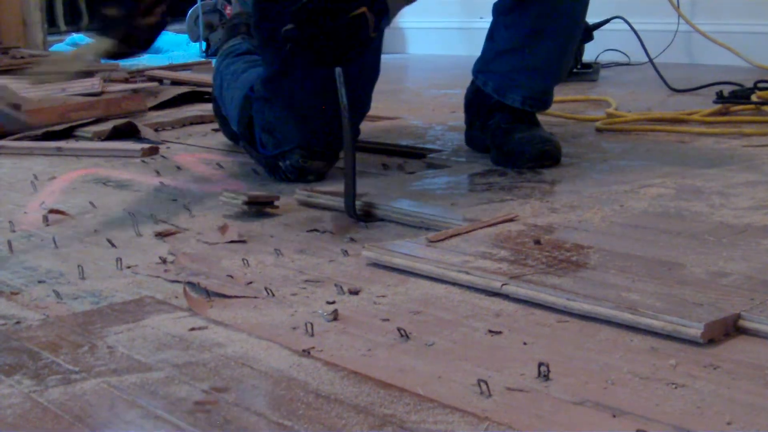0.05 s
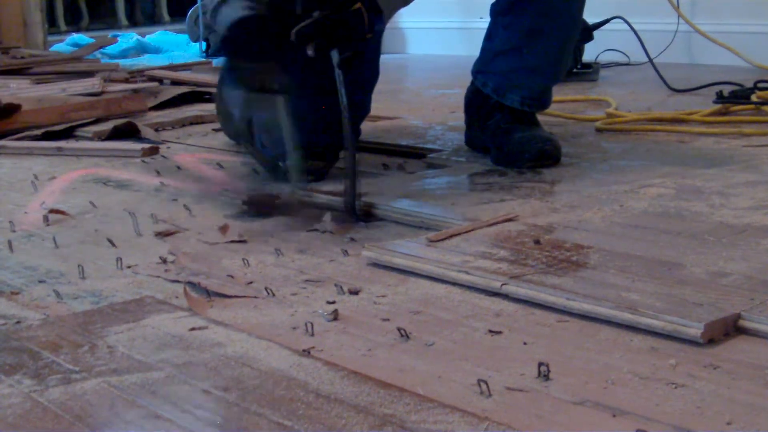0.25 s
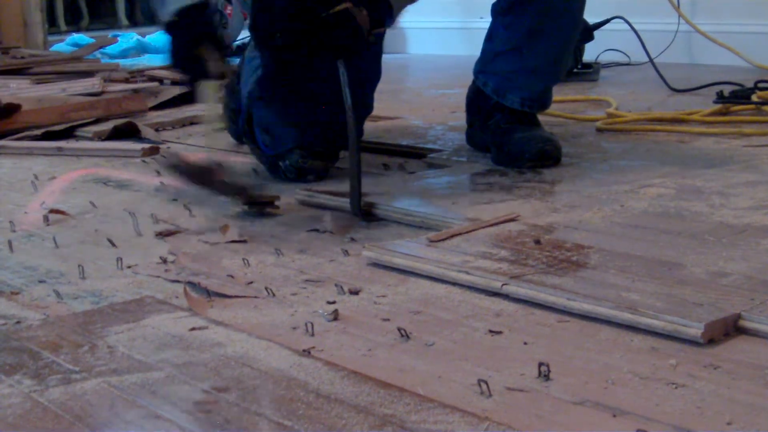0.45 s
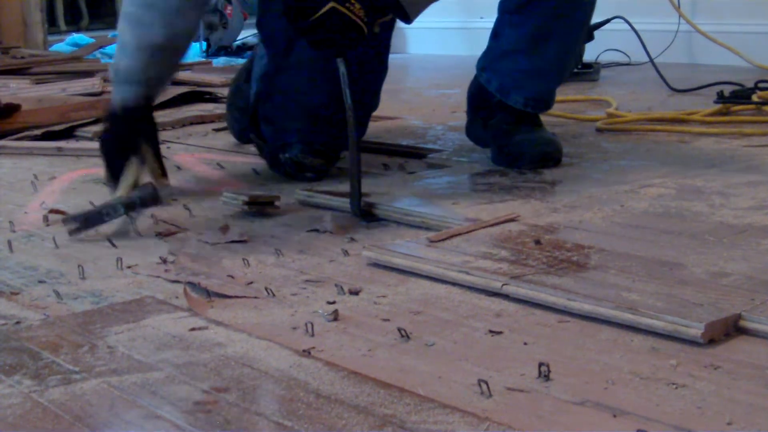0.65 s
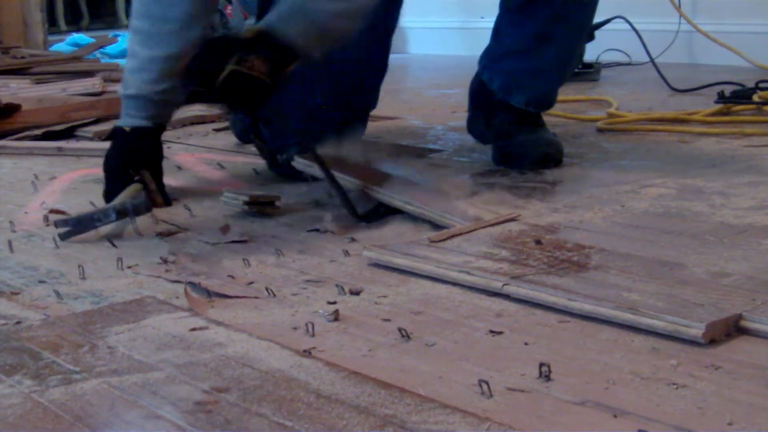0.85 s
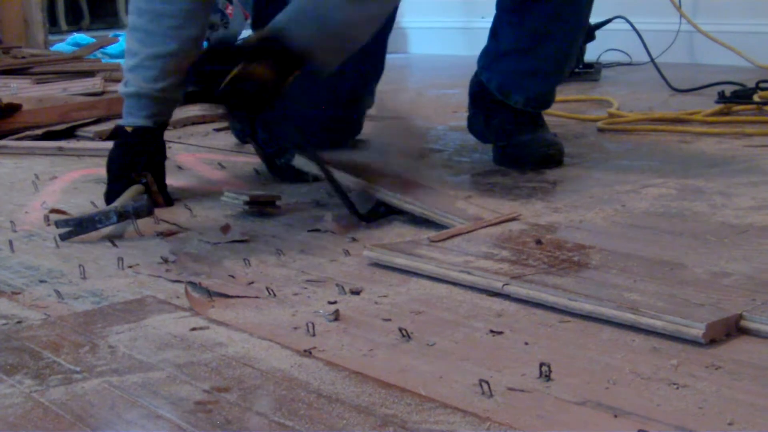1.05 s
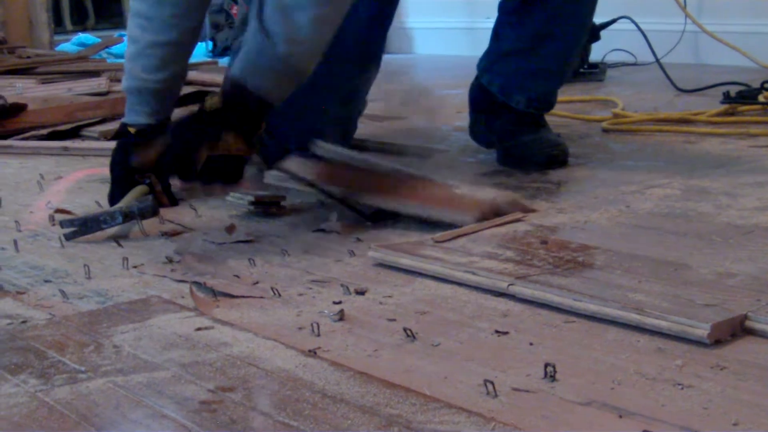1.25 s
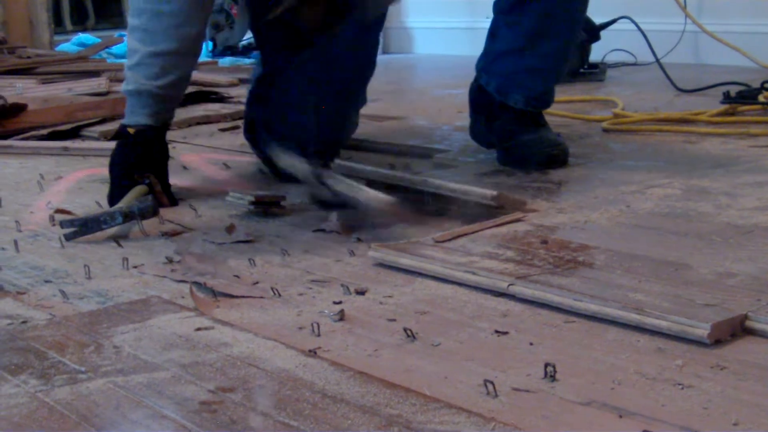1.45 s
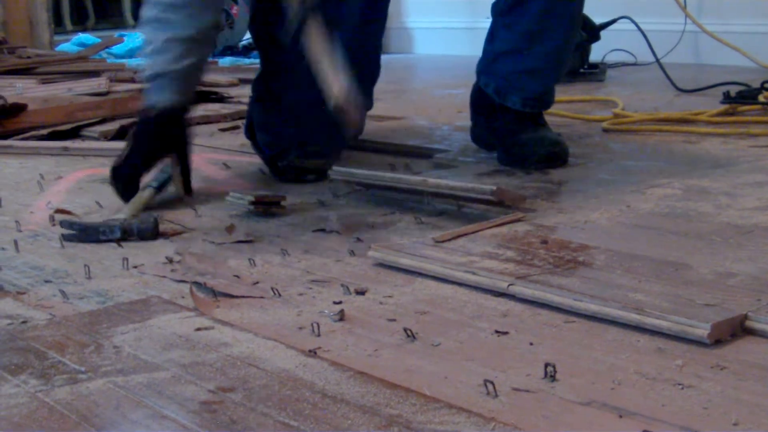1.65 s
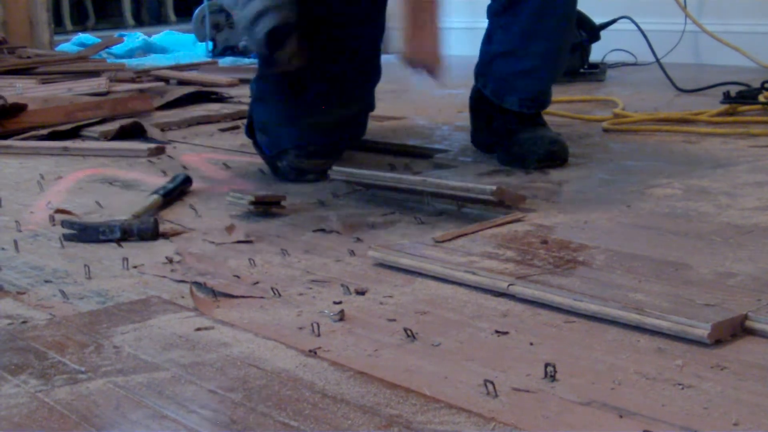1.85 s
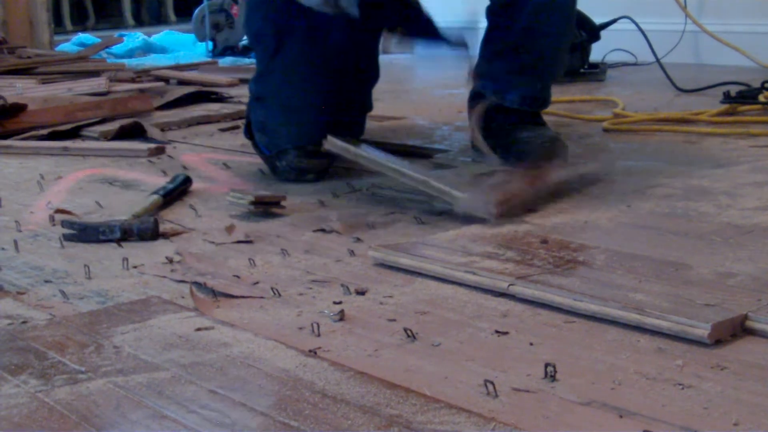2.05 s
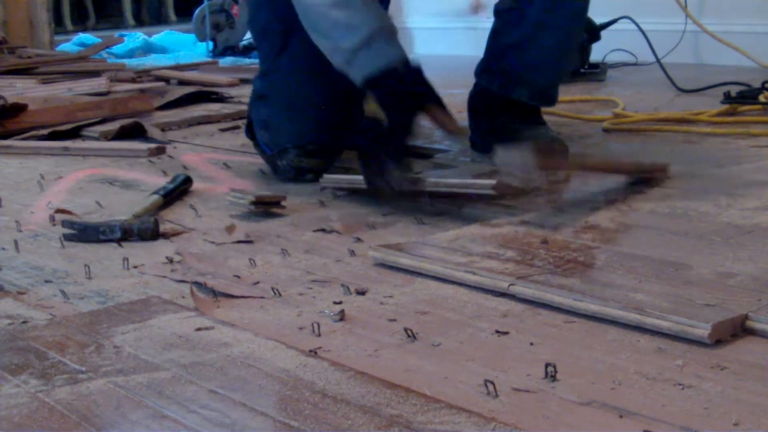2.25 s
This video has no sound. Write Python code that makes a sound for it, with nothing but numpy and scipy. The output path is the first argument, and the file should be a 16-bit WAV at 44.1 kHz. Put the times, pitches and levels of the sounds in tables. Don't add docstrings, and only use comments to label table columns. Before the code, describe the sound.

Hardwood floor strip being pried up: a bright hammer blow on a steel bar, the hammer set down with a gritty scrape, a sharp wood crack, then a piece knocks down, close microphone in an echoing empty room.

```python
import sys
import numpy as np
from scipy import signal
from scipy.fft import rfft, irfft
from scipy.io import wavfile

SR = 44100
rng = np.random.default_rng(int(sys.argv[2]) if len(sys.argv) > 2 else 0)


def file_out(sig):
    cols = np.atleast_2d(sig).T
    lim = np.clip(cols, -1, 1)
    pcm = np.round(lim * 32767).astype(np.int16)
    wavfile.write(sys.argv[1], SR, pcm)


def volts_from_db(level):
    exponent = np.asarray(level, float) / 20
    return 10 ** exponent


N = 101429
LEAD = SR // 2


def at_hz(points, hz):
    table_hz, value = np.transpose(points)
    return np.interp(np.log(hz + 1), np.log(table_hz), value)


def body(spectrum, peaks, broad_db):
    half = 16384
    hz = np.arange(half + 1) * SR / (2 * half)
    power = volts_from_db(2 * (at_hz(spectrum, hz) + broad_db))
    for centre_hz, width_hz, level_db in peaks:
        power = power + volts_from_db(2 * level_db) / (1 + (2 * (hz - centre_hz) / width_hz) ** 2) ** 2
    cepstrum = irfft(np.log(power) / 2)
    cepstrum[1:half] *= 2
    cepstrum[half + 1:] = 0
    answer = irfft(np.exp(rfft(cepstrum)))[:half]
    return answer / np.abs(answer).max()


def contacts(rows, rattle_s=0.0006):
    loop_gain, treble_hz, length = 0.825, 3635, 1000
    out = np.zeros(N + LEAD)
    low_pass = signal.butter(2, treble_hz, fs=SR)
    for start_s, level_db, treble_db in rows:
        burst = signal.unit_impulse(length)
        gaps = rng.uniform(0.15, 1, 4) * rattle_s * SR
        for gap in np.maximum(gaps, 1).astype(int):
            forward = np.r_[loop_gain, np.zeros(gap), 1]
            burst = signal.lfilter(forward, forward[::-1], burst)
        for stage in range(2):
            low = signal.lfilter(*low_pass, burst)
            burst = low + volts_from_db(treble_db / 2) * (burst - low)
        i = int(start_s * SR) + LEAD
        out[i:i + length] += 2 * volts_from_db(level_db) * burst[:len(out) - i]
    return out


def strike(hits, answer):
    return signal.fftconvolve(hits, answer)[:N + LEAD]


# start_s [s], level_db [dB], treble_db [dB]
BLOW_HITS = [
    (.2085, -38, 6),
    (.2108, 0, -2),
]
# pitch_hz [Hz], level_db [dB per Hz]
BAR_COLOUR = [(35, -90.5), (60, -71), (246, -22), (667, -17), (784, -19.5), (1310, -5.5), (4250, -11),
              (9570, -13), (15200, -20.5)]
# pitch_hz [Hz], width_hz [Hz], level_db [dB]
BAR_MODES = [(290, 38, -14), (662, 69, -13), (1480, 300, -8), (2569, 210, -3), (5880, 740, -3),
             (7870, 250, -10), (9670, 400, -2.5), (11530, 1000, -7), (15310, 150, -13.5)]


def hammer_blow():
    return strike(contacts(BLOW_HITS, rattle_s=0.001), body(BAR_COLOUR, BAR_MODES, broad_db=2.0))


# start_s [s], level_db [dB], treble_db [dB]
CRACK_HITS = [
    (1.0505, -42, -10),
    (1.0548, -28, -30),
    (1.0565, -16.5, -18),
    (1.064, -22.5, -9),
    (1.067, -7, -13),
    (1.0792, -28, 7),
    (1.089, -28.5, 7),
    (1.098, -38, 6),
]
# pitch_hz [Hz], level_db [dB per Hz]
STRIP_COLOUR = [(24, -60), (40, -25), (530, -15.5), (663, -9.5), (851, -8), (1330, -2), (3510, -8),
                (12500, -11.5), (15200, -22.5)]
# pitch_hz [Hz], width_hz [Hz], level_db [dB]
STRIP_MODES = [(1303, 86, 2.5), (1860, 900, -32), (2534, 410, -4.5), (5640, 1260, -3.5), (10960, 3400, -8)]


def strip_cracks():
    return strike(contacts(CRACK_HITS, rattle_s=0.00045), body(STRIP_COLOUR, STRIP_MODES, broad_db=-1.5))


# start_s [s], level_db [dB], treble_db [dB]
END_LANDINGS = [
    (2.013, -21, -2.5),
    (2.025, -38, 3),
]
# pitch_hz [Hz], level_db [dB per Hz]
END_COLOUR = [(24, -68), (40, -45.5), (178, -16), (963, -7.5), (1400, 1.5), (1710, -7), (2130, 2.5),
              (3420, -12), (15200, -42.5)]
# pitch_hz [Hz], width_hz [Hz], level_db [dB]
END_MODES = [(258, 230, -22.5), (1380, 80, -18), (1790, 40, -9), (2187, 260, -4.5), (2550, 87, -11.5),
             (3146, 98, -10), (4310, 240, -19.5), (10900, 2000, -35)]


def piece_lands_on_end():
    return strike(contacts(END_LANDINGS), body(END_COLOUR, END_MODES, broad_db=-9.0))


# start_s [s], level_db [dB], treble_db [dB]
FLAT_LANDINGS = [
    (2.2575, -33.5, -4),
    (2.2615, -34.5, -1.5),
    (2.274, -40, -4.5),
    (2.279, -38, 2),
    (2.291, -43, 12),
]
# pitch_hz [Hz], level_db [dB per Hz]
FLAT_COLOUR = [(35, -37.5), (60, -51.5), (732, -2), (1570, 0), (2030, -7), (2280, -11), (3450, -30),
               (11200, -51.5), (15200, -45)]
# pitch_hz [Hz], width_hz [Hz], level_db [dB]
FLAT_MODES = [(296, 86, -2.5), (741, 75, 1), (1400, 51, -4), (2310, 340, 4), (11300, 4500, -36)]


def piece_falls_flat():
    return strike(contacts(FLAT_LANDINGS), body(FLAT_COLOUR, FLAT_MODES, broad_db=2.0))


# start_s [s], level_db [dB]
DRAG_PRESSURE = [
    (0.671, -74),
    (.71, -75.5),
    (.737, -65),
    (0.74, -55.5),
    (.765, -62.5),
    (.785, -55),
    (0.809, -68),
    (.86, -72),
]


def drag():
    grit_per_s, spread_db = 2500, 5.22
    length = N + LEAD
    start_s, level_db = np.transpose(DRAG_PRESSURE)
    born = rng.random(length) < grit_per_s / SR
    sizes = volts_from_db(spread_db * np.minimum(rng.exponential(1, length), 4))
    signs = rng.choice([-1, 1], length)
    t = (np.arange(length) - LEAD) / SR
    return born * sizes * signs * volts_from_db(np.interp(t, start_s, level_db, -200, -200))


# start_s [s], level_db [dB], treble_db [dB]
LAY_DOWN_KNOCKS = [(.61, -43.5, -38), (.66, -47.5, -36), (.68, -64, -3), (.693, -64, 10),
                   (.71, -45.5, -3.5), (.718, -54, 8), (.7405, -40.5, 0.5), (.752, -51.5, 15.5),
                   (.77, -49, -11.5), (.778, -33.5, -37), (.7815, -37, -19), (.787, -44, -11),
                   (.794, -53, 18.5), (.797, -55, -2), (.804, -48, -14), (.813, -51, 11)]
# pitch_hz [Hz], level_db [dB per Hz]
GRIT_COLOUR = [(24, -45), (40, -11), (292, -8), (468, -7), (1180, 3), (1620, -3.5), (2080, -7),
               (11000, -15), (15200, -28)]
# pitch_hz [Hz], width_hz [Hz], level_db [dB]
GRIT_MODES = [(1210, 160, -28), (2150, 790, -0.5), (11100, 5200, -11.5)]


def hammer_laid_down():
    hits = contacts(LAY_DOWN_KNOCKS, rattle_s=0.0013) + drag()
    return strike(hits, body(GRIT_COLOUR, GRIT_MODES, broad_db=0.5))


# start_s [s], level_db [dB], treble_db [dB]
SPLINTER_TICKS = [
    (1.9405, -55.5, -3),
    (1.9425, -45.5, -11),
    (1.9448, -54, 14),
    (1.95, -45, -25),
    (1.976, -82, -5),
]
# pitch_hz [Hz], level_db [dB per Hz]
SPLINTER_COLOUR = [(35, -65), (60, -46), (219, 12), (401, -1.5), (715, 10.5), (1060, -2), (1570, 9),
                   (2940, -7), (15200, -19.5)]
# pitch_hz [Hz], width_hz [Hz], level_db [dB]
SPLINTER_MODES = [(1440, 600, 2), (2535, 260, 1.5), (5500, 700, -20)]


def splinter_lands():
    return strike(contacts(SPLINTER_TICKS), body(SPLINTER_COLOUR, SPLINTER_MODES, broad_db=-9.0))


# start_s [s], level_db [dB], treble_db [dB]
STRIP_NUDGES = [
    (1.402, -63, -3),
    (1.592, -57.5, -6),
    (1.607, -56.5, -8),
    (1.617, -64.5, 1),
]
# pitch_hz [Hz], level_db [dB per Hz]
LOOSE_COLOUR = [(59, -64), (100, -16.5), (237, -1), (409, -5), (872, -6.5), (2060, -38), (10900, -25),
                (15200, -39)]
# pitch_hz [Hz], width_hz [Hz], level_db [dB]
LOOSE_MODES = [(920, 160, -8), (1264, 180, -8), (3370, 120, -32)]


def loose_strip_nudged():
    return strike(contacts(STRIP_NUDGES, rattle_s=0.0029), body(LOOSE_COLOUR, LOOSE_MODES, broad_db=-2.5))


# start_s [s], level_db [dB], treble_db [dB]
KNEE_THUDS = [
    (.712, -54, -3),
    (.723, -60, -5),
    (1.543, -58.5, -9),
    (1.549, -59.5, -18),
    (1.572, -56.5, -6),
    (1.62, -64, -15),
    (1.657, -63, -1),
    (1.686, -59.5, -3),
]
# pitch_hz [Hz], level_db [dB per Hz]
SUBFLOOR_COLOUR = [(24, -47), (40, -12), (280, -1), (654, -12.5), (808, -23), (925, -10.5), (4000, -31),
                   (5200, -58), (8800, -120)]
# pitch_hz [Hz], width_hz [Hz], level_db [dB]
SUBFLOOR_MODES = [(251, 56, -1), (320, 25, 1)]


def knee_thuds():
    return strike(contacts(KNEE_THUDS), body(SUBFLOOR_COLOUR, SUBFLOOR_MODES, broad_db=-4.5))


# start_s [s], pitch_hz [Hz], level_db [dB], t60_s [s]
BOARD_RINGS = [(.212, 1510, -7.5, .02), (0.233, 2437, -18.5, 0.041), (.216, 273, -35, 0.064),
               (.232, 710, -25, 0.047), (.741, 1010, -47, 0.025), (.771, 1900, -44, 0.022),
               (0.7785, 2410, -35, 0.017), (.781, 1335, -32, 0.022), (.795, 910, -38, 0.028),
               (1.056, 1333, -27, 0.068), (1.0567, 2200, -21, 0.016), (1.0636, 1760, -17, 0.025),
               (1.0677, 1934, -19, 0.026), (1.0716, 1337, -27, 0.16), (1.5436, 320, -53, .12),
               (1.572, 265, -47.5, .07), (1.591, 1242, -49.5, 0.04), (1.607, 840, -47.5, 0.038),
               (1.615, 954, -47.5, 0.033), (1.62, 290, -53, 0.044), (1.9442, 5610, -34, .01),
               (1.948, 2535, -43, .04), (2.015, 2114, -38, 0.81), (2.015, 2193, -37, 0.44),
               (2.04, 1376, -39.5, 0.54), (2.0135, 2150, -25, 0.047), (2.0295, 2200, -23, 0.027),
               (2.014, 696, -29, 0.032), (2.26, 296, -38.5, 0.035), (2.274, 2310, -32.5, 0.049)]


def rings():
    rise_s = 0.0009
    start_s, pitch_hz, level_db, t60_s = np.transpose(BOARD_RINGS)[:, :, None]
    t = np.maximum(np.arange(N) / SR - start_s, 0)
    decay = volts_from_db(level_db - 60 * t / t60_s)
    return (decay * np.sin(2 * np.pi * pitch_hz * t) * (1 - np.exp(-t / rise_s))).sum(axis=0)


# start_s [s], level_db [dB]
JOIST_JOLTS = [
    (0.21, -71),
    (.72, -56),
    (0.789, -53),
    (1.068, -66),
    (1.2, -64),
    (1.561, -67),
    (1.77, -70),
    (2.031, -60),
    (2.272, -74),
]


def joists():
    pitch_hz, t60_s, rise_s, left_db = 61.4, 0.15, 0.012, 0.8
    clicks = np.zeros(N)
    for start_s, level_db in JOIST_JOLTS:
        clicks[int(start_s * SR)] = volts_from_db(level_db)
    t = np.arange(LEAD) / SR
    mode = np.sin(2 * np.pi * pitch_hz * t) * volts_from_db(-60 * t / t60_s) * (1 - np.exp(-t / rise_s))
    return signal.fftconvolve(clicks, mode)[:N] * volts_from_db([[left_db], [-left_db]])


# start_s [s], level_db [dB], treble_db [dB]
EARLIER_HIT = [
    (-.27, -7.5, 4.5),
]
# pitch_hz [Hz], level_db [dB per Hz]
EARLIER_COLOUR = [(60, -44), (300, -21), (640, -20), (1500, -8.5), (6000, -18.5), (12000, -23.5),
                  (15200, -53.5)]
# pitch_hz [Hz], width_hz [Hz], level_db [dB]
EARLIER_MODES = [(645.6, 26, -9.5), (1240, 380, 1), (2310, 420, 1), (2760, 98, -8), (3690, 90, -3.5),
                 (5140, 1500, -12.5)]


def earlier_blow():
    return strike(contacts(EARLIER_HIT), body(EARLIER_COLOUR, EARLIER_MODES, broad_db=2.5))


# pitch_hz [Hz], t60_s [s]
ROOM_DECAY = [(100, 0.29), (260, 0.91), (700, 0.82), (1840, 0.63), (4850, 0.62), (12800, 0.34)]
# delay_s [s], level_db [dB]
FIRST_WALLS = [(.01, -28.5), (.017, -30.5), (0.023, -29), (0.035, -32.5)]
# pitch_hz [Hz], level_db [dB]
STEREO_WIDTH = [(60, -17), (250, -27), (700, -31), (1500, -40), (2800, -39), (5000, -40), (15000, -46.5)]


def room():
    tail_db, rise_s, scatter_s = -24.5, 0.0036, 0.0032
    flutter_s, flutter_share = 0.0175, 0.39
    t = np.arange(int(SR * 1.4)) / SR
    edges_hz = 30 * 2 ** np.arange(0, 9.6, 0.5)
    white = rng.standard_normal((2, 2, len(t)))
    tail = 0
    for k, (low, high) in enumerate(zip(edges_hz, edges_hz[1:])):
        hz = np.sqrt(low * high)
        band_pass = signal.butter(2, [low, high], "band", fs=SR, output="sos")
        band = signal.sosfilt(band_pass, white[k % 2])
        side_share = volts_from_db([[0], [at_hz(STEREO_WIDTH, hz)]])
        tail = tail + band * volts_from_db(-60 * t / at_hz(ROOM_DECAY, hz)) * side_share
    flutter = 1 + flutter_share * np.cos(2 * np.pi * t / flutter_s) * np.exp(-t / 0.08)
    out = volts_from_db(tail_db) * tail * flutter * (1 - np.exp(-(t / rise_s) ** 2))
    for delay_s, level_db in FIRST_WALLS:
        out[0] += volts_from_db(level_db) * white[0, 0, ::-1] * np.exp(-((t - delay_s) / scatter_s) ** 2)
    return out


# pitch_hz [Hz], level_db [dB per Hz]
HUSH_COLOUR = [(25, -13.5), (60, 2.5), (200, -10), (1200, -16.5), (2000, -8.5), (2900, -21.5),
               (3500, -14.5), (4200, -29), (15000, -50)]


def hush():
    level_db = -82
    hz = np.arange(N // 2 + 1) * SR / N
    colour_db = at_hz(HUSH_COLOUR, hz) + [0 * hz, at_hz(STEREO_WIDTH, hz) + 6]
    noise = irfft(rfft(rng.standard_normal((2, N))) * volts_from_db(colour_db), N)
    return volts_from_db(level_db) * noise / noise[0].std()


def scene():
    knee, nudged = knee_thuds(), loose_strip_nudged()
    placed = [(hammer_blow(), 3), (strip_cracks(), 3), (piece_lands_on_end(), -1.5),
              (piece_falls_flat(), 1.5), (hammer_laid_down(), 6), (splinter_lands(), 6),
              (nudged, 3), (knee, 0.5), (earlier_blow(), 0)]
    direct = sum(volts_from_db(near_db) * sound for sound, near_db in placed)[LEAD:]
    everything = sum(sound for sound, near_db in placed)
    echo = room()
    reverb = signal.fftconvolve(everything[None], echo, axes=1)[:, LEAD:N + LEAD]
    mid, side = reverb + hush()
    side = side + 0.074 * signal.fftconvolve(knee + nudged, echo[0])[LEAD:N + LEAD]
    return direct + rings() + np.array([mid + side, mid - side]) + joists()


def roll_off(x):
    return signal.sosfilt(signal.butter(12, 16370, fs=SR, output="sos"), x)


def record(dry):
    dip_hz, dip_width_hz, dip_share = 7950, 250, 0.44
    ceiling, cutoff_hz = 0.86, 15300
    dip = signal.lfilter(*signal.iirpeak(dip_hz, dip_hz / dip_width_hz, fs=SR), dry)
    rounded = ceiling * np.tanh((dry - dip_share * dip) / ceiling)
    low_pass = signal.cheby2(8, 32, cutoff_hz * 1.03, fs=SR, output="sos")
    finished = signal.sosfilt(low_pass, rounded)
    return roll_off(finished)


dry = scene()
out = record(dry)
file_out(out)
```